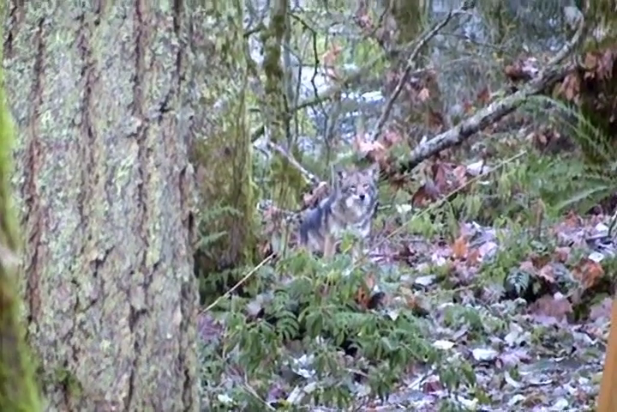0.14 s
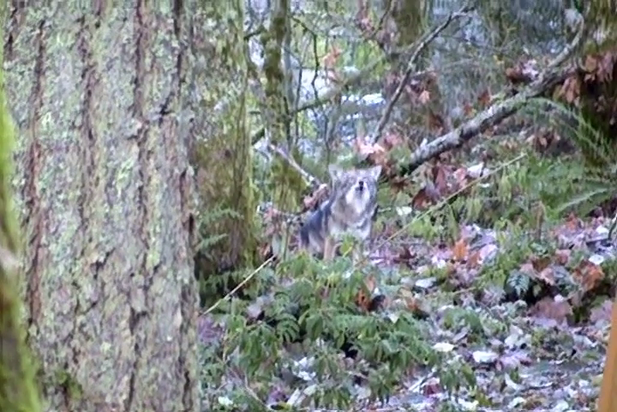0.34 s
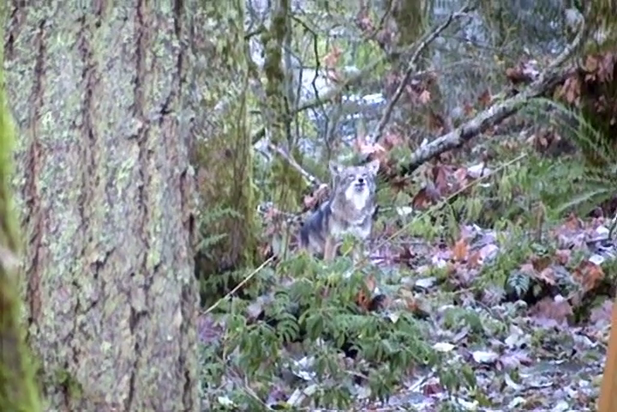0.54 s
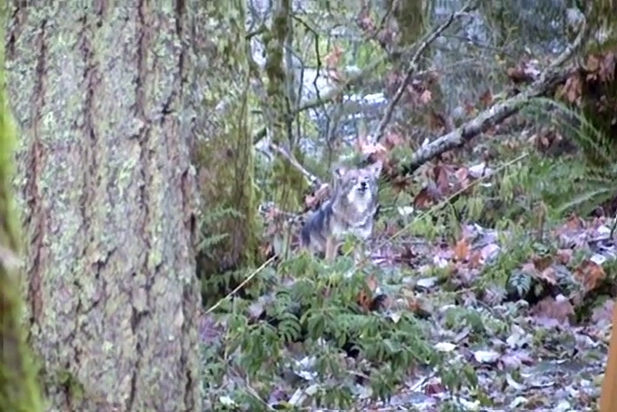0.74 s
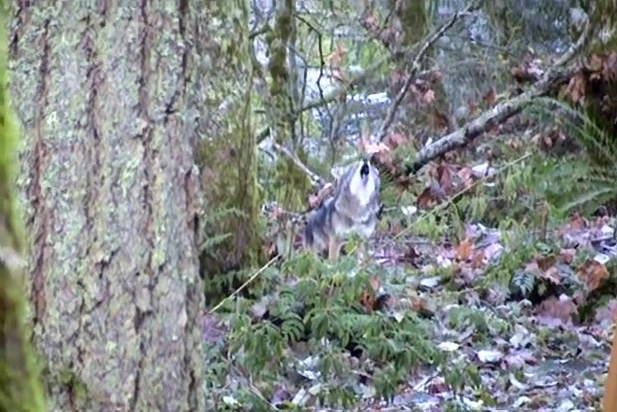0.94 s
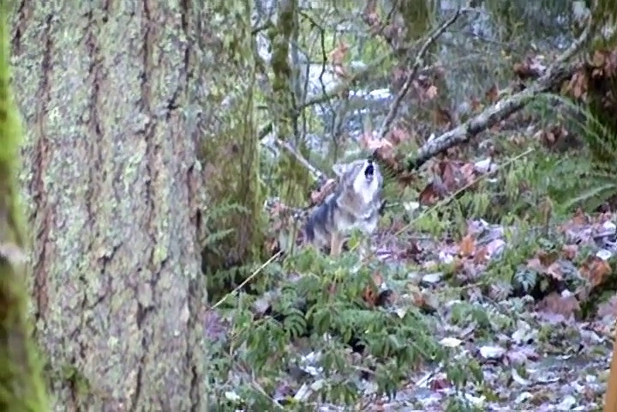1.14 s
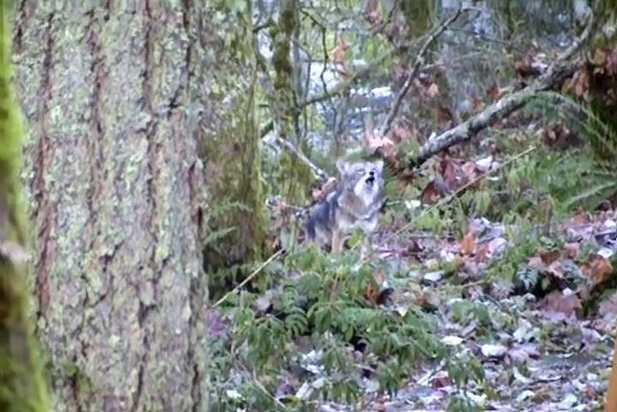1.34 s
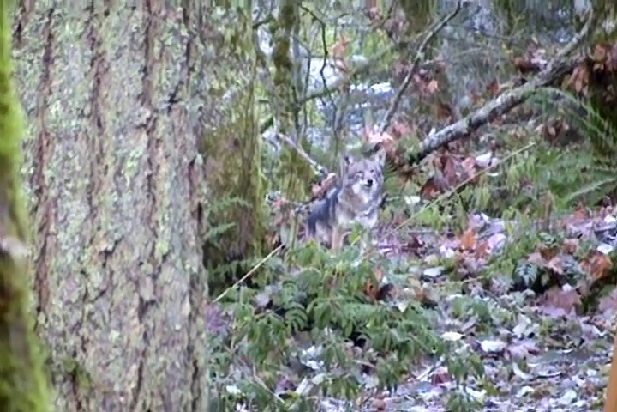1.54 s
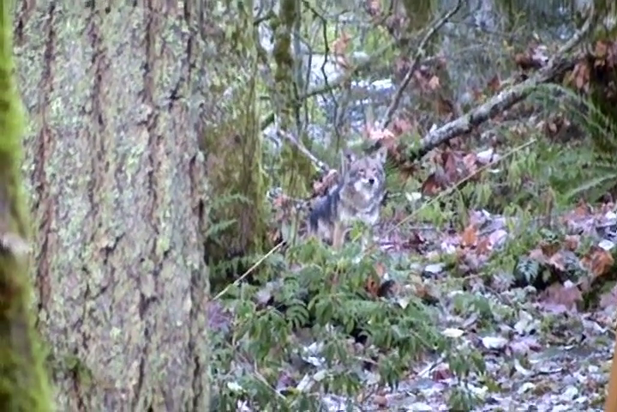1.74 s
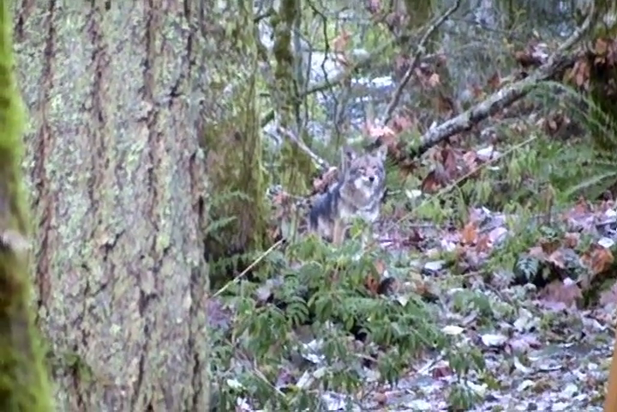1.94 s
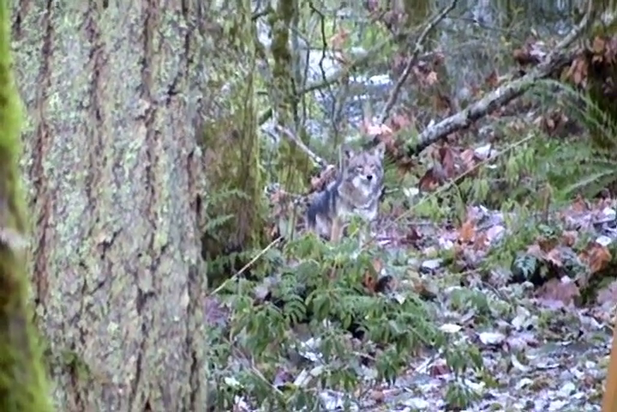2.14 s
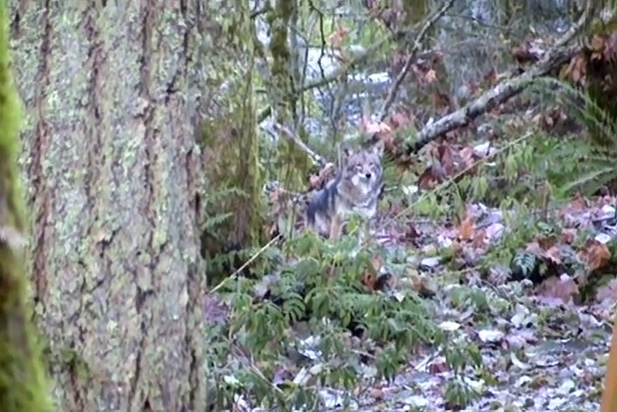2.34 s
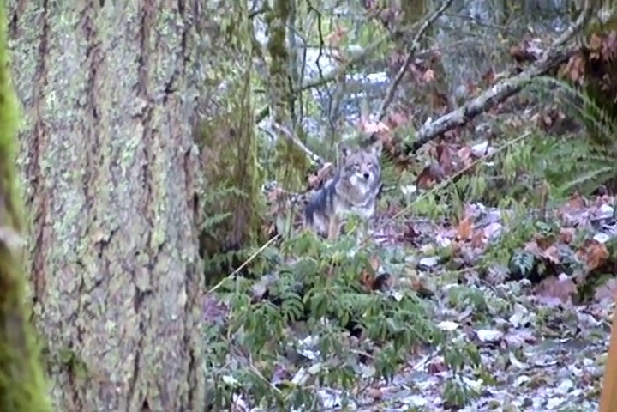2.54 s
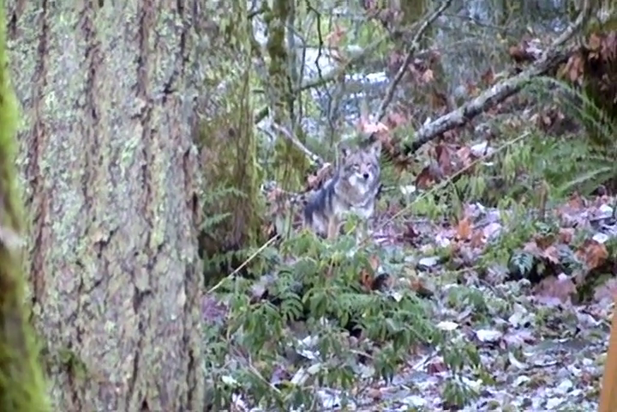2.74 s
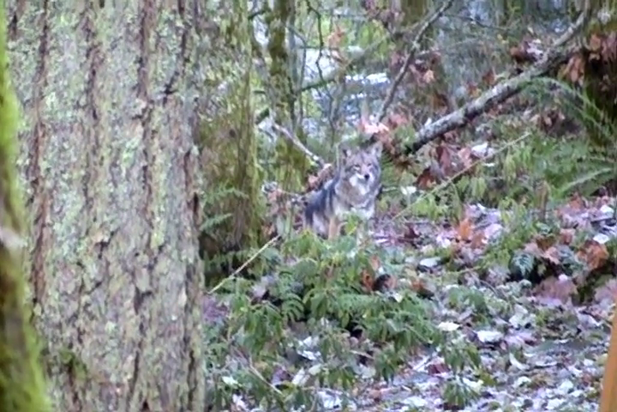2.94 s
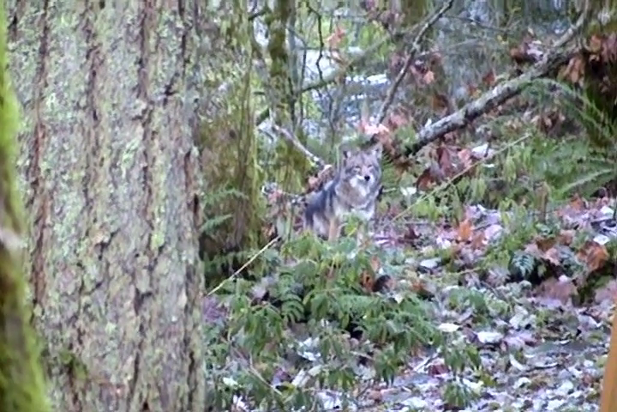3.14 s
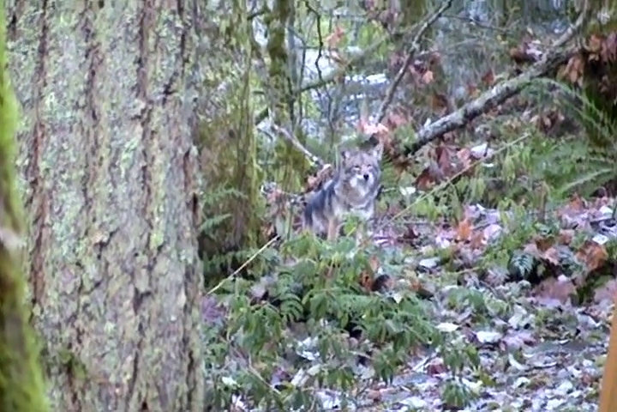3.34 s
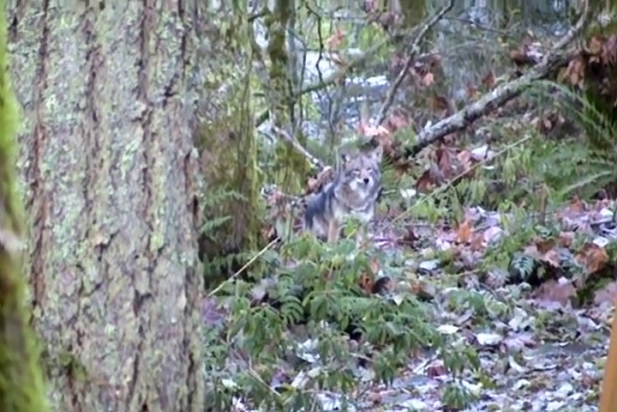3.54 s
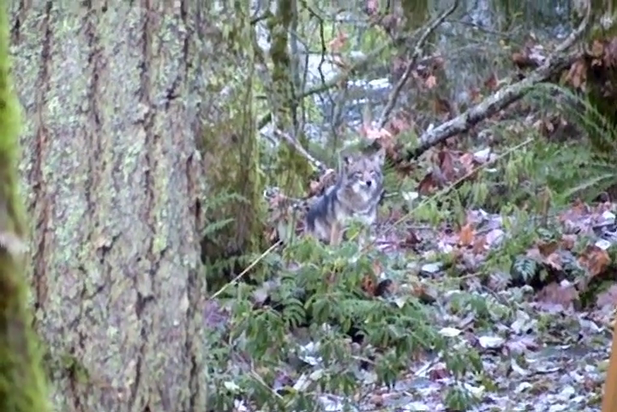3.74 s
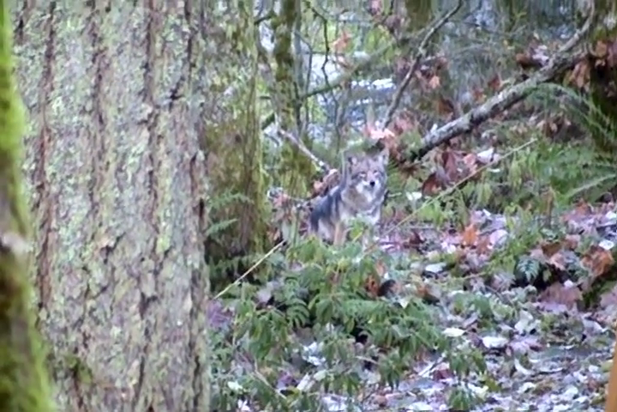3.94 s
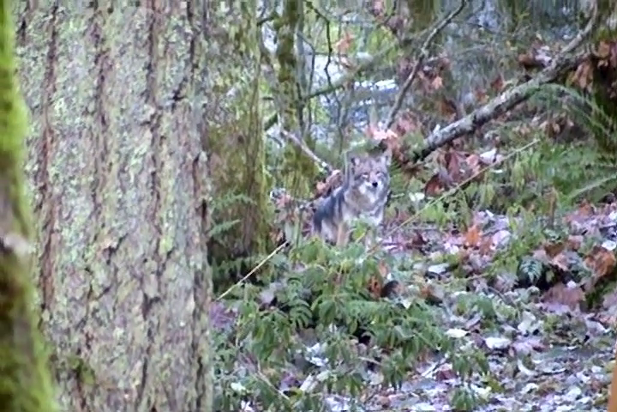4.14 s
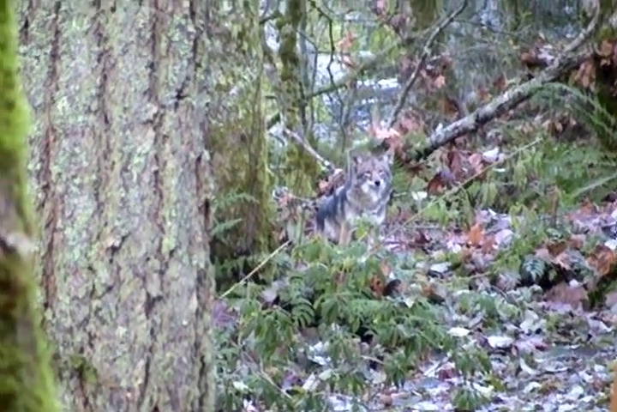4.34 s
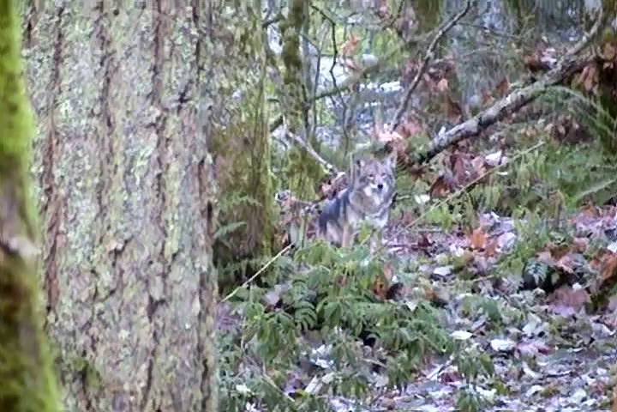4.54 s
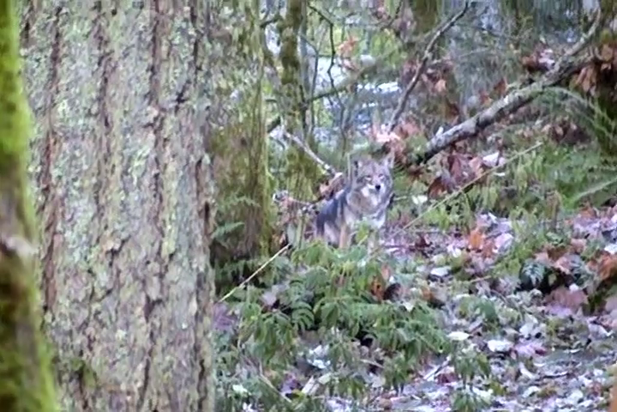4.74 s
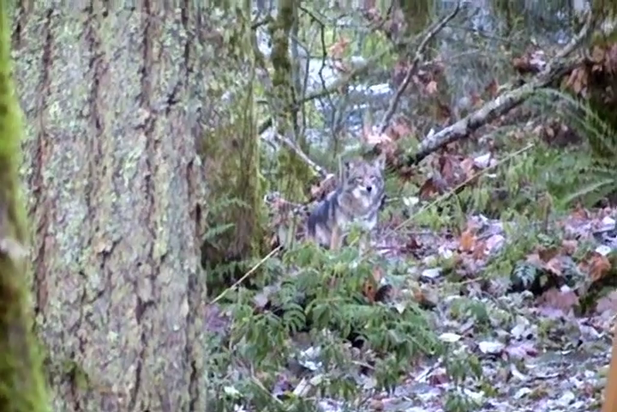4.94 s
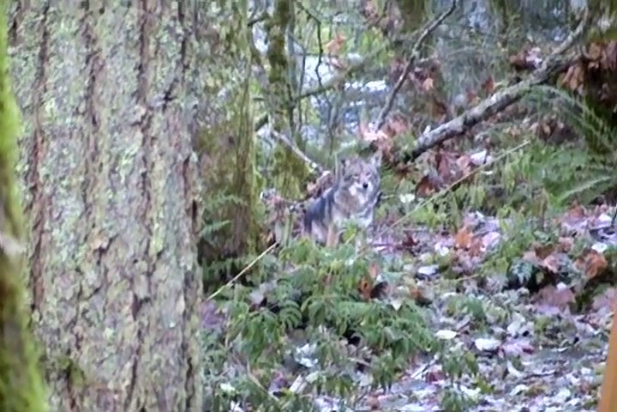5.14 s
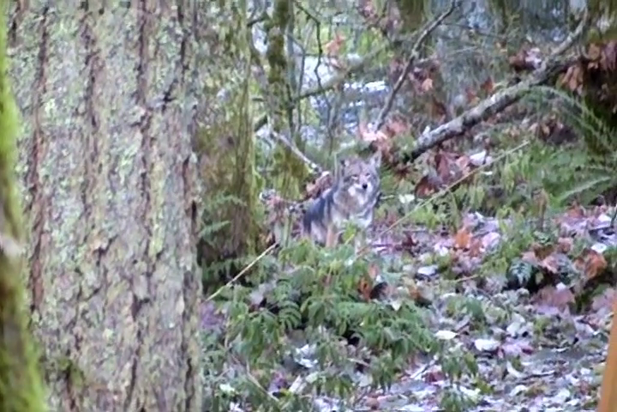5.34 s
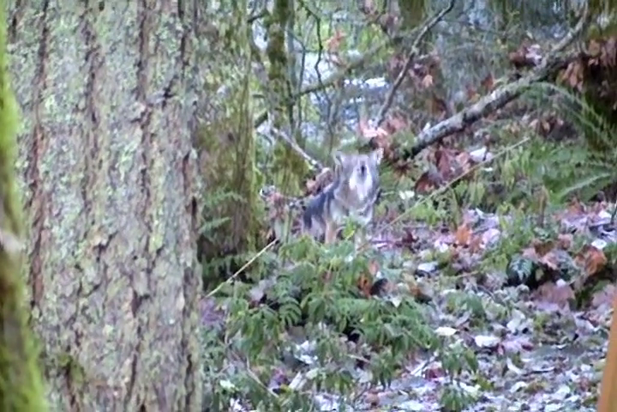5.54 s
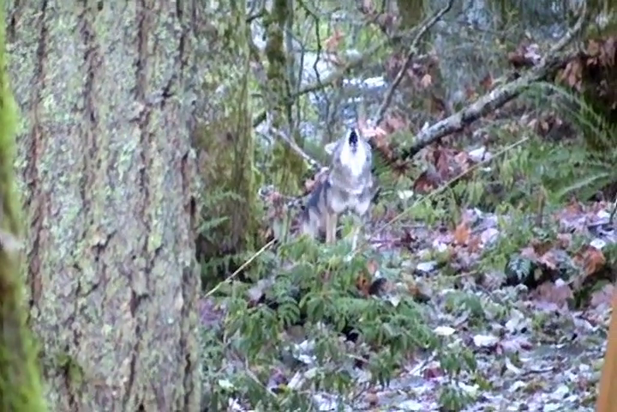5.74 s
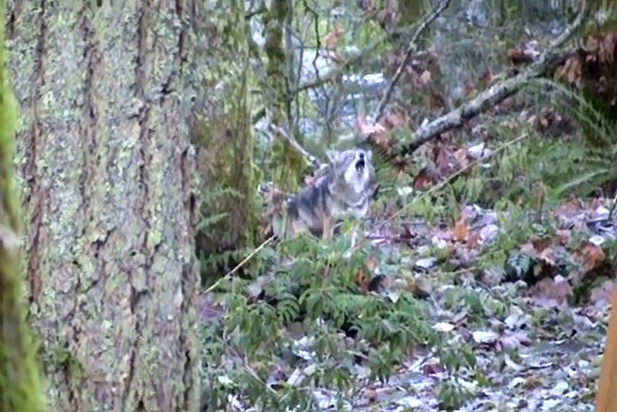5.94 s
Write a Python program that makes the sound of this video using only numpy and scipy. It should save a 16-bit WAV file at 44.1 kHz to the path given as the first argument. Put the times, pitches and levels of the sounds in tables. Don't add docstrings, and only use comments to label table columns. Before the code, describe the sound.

Wet forest, quiet airy rush and faint distant traffic. A coyote barks sharply, then yelps on two ringing notes, the second higher and louder, before its voice drops. Far behind the trees a dog barks in hoarse, irregular short bursts, blurred by woodland reverberation. The coyote woofs quietly once, then stays silent until a sudden loud snarl and yelp end abruptly. The microphone hears the coyote directly, narrow in the centre, with trunk echoes.

```python
import sys
import numpy as np
from scipy import signal
from scipy.fft import rfft, irfft, next_fast_len
from scipy.io import wavfile
from scipy.ndimage import uniform_filter1d, minimum_filter1d

SR = 44100
rng = np.random.default_rng(int(sys.argv[2]) if len(sys.argv) > 2 else 0)


def invert_db(level):
    return 10 ** (np.asarray(level, dtype=float) / 20)


def dump(signal):
    limited = np.clip(np.atleast_2d(signal).T, -1, 1)
    pcm = np.round(limited * 32767).astype(np.int16)
    wavfile.write(sys.argv[1], SR, pcm)


N = 268128


def level(x, db):
    return x * invert_db(db) / np.sqrt(np.mean(x ** 2))


def colour(x, table, stretch=0.98):
    size = next_fast_len(x.shape[-1] + 2048)
    hz = np.fft.rfftfreq(size, 1 / SR) + 1
    points_hz, points_db = np.transpose(table)
    gain_db = np.interp(np.log(hz / stretch), np.log(points_hz), points_db)
    return irfft(rfft(x, size) * invert_db(gain_db), size)[..., :x.shape[-1]]


def noise(count):
    return rng.standard_normal(max(count, SR // 2))[:count]


def walk(count, rate_hz, slowest_hz=0):
    k = max(int(SR / rate_hz), 1)
    x = uniform_filter1d(uniform_filter1d(noise(count), k), k)
    if slowest_hz:
        x = x - uniform_filter1d(x, int(SR / slowest_hz))
    return level(x, 0)


def coyote():
    # f/Hz, level/dB
    mouth_table = [(200, -47), (420, -16), (700, -12), (1000, -9), (1500, -2), (2000, -12.5), (2700, -23),
                   (3400, -40.5), (5000, -53.5), (8000, -92)]
    # f/Hz, level/dB
    skull_table = [(3000, -90), (4350, -58), (4900, -38), (5400, -38), (6150, -26), (6700, -34),
                   (7300, -28), (8300, -42), (9200, -62), (11300, -56), (13000, -76), (15000, -95)]
    # f/Hz, level/dB
    larynx_table = [(2000, -95), (2800, -60), (3400, -41), (3600, -31), (3850, -42), (4600, -60),
                    (6000, -95)]
    # f/Hz, level/dB
    rasp_table = [(300, -34), (600, -16), (870, -16), (990, -3), (1090, -5), (1250, -9), (1400, -5),
                  (1480, 0), (1600, -5), (2200, -12), (3000, -23), (5000, -55), (8000, -95)]
    effort_treble, flap_hz, breath = 1.25, 471, 0.1
    hold = 2601
    out = np.zeros(N + SR)
    for mouth, treble_db, first_db, flap_db, rough, rows in syllables():
        s, hz, db = np.transpose(rows)
        i = np.arange(int(s[0] * SR), int(s[-1] * SR))
        effort_db = np.interp(i / SR, s, db)
        wide_db = np.pad(effort_db, hold, constant_values=-99)
        peaks_db = -minimum_filter1d(-wide_db, size=hold)
        held_db = minimum_filter1d(peaks_db, size=hold)[hold:-hold]
        tone, air = folds(np.interp(i / SR, s, hz), rough, first_db + effort_db - held_db)
        leak = air * (1 + breath / rough)
        flap = invert_db(flap_db + 3.8 * walk(len(i), 25)) * np.cos(2 * np.pi * flap_hz * i / SR)
        tone = tone * (1 + 2 * flap)
        larynx = colour(.45 * tone + leak, larynx_table)
        skull = invert_db(effort_treble * (held_db - db.max())) * colour(tone + leak, skull_table)
        voice = colour(tone, mouth_table, mouth) + colour(air, rasp_table, mouth)
        voice = voice + invert_db(treble_db) * (larynx + skull)
        out[i] += level(voice, 0) * invert_db(held_db) * signal.windows.tukey(len(i), 200 / len(i))
    return out[:N]


def folds(hz, rough, first_db=0.):
    count = len(hz)
    wobble = .0015 * walk(count, 40) + .11 * rough * walk(count, 300, 50)
    phase = 2 * np.pi * np.cumsum(hz * (1 + wobble)) / SR
    order = np.arange(2, int(13000 / hz.max()) + 1)[:, None]
    knots_db = rng.standard_normal((48, 16))[:len(order)] * np.minimum(.4 * order, 4.5)
    knot_at = np.arange(count) / 1500
    sway_db = np.array([np.interp(knot_at, np.arange(16), k) for k in knots_db])
    overtones = (invert_db(sway_db) * np.cos(order * phase + order ** 2)).sum(axis=0)
    stack = overtones + invert_db(first_db) * np.cos(phase)
    air = noise(count) * (1 + .8 * np.cos(phase))
    return level(stack, 0) * invert_db(5 * rough * walk(count, 250, 40)), 1.7 * rough * air


def syllables():
    calls = rises() + breaks() + undertones() + woofs() + whistles() + long_notes()
    return sorted(calls, key=lambda call: call[-1][0][0])


def shaped(s, length_s, db, from_hz, to_hz, shape, bend):
    attack, release, onset_db, swell_db, end_db = shape
    u = np.linspace(0, 1, num=33)
    under_db = np.interp(u, [0, attack, 1 - release, 1], [onset_db, swell_db, 0, end_db])
    return np.transpose([s + length_s * u, from_hz + (to_hz - from_hz) * u ** bend, db - under_db])


def rises():
    # t/s, length/s, peak/dB, top f/Hz, mouth stretch
    rise_table = [
        (0.399, .105, -17, 600, 0.87),
        (0.919, 0.1, -18.5, 701.4, 0.7),
        (5.724, 0.096, -15.5, 627.4, 0.85),
    ]
    shape = (0.24, 0.086, 29, 11.1, 11)
    chest_hz, rough, bend = 452.4, .3, 1.4
    return [(mouth, 2.5, 10, -35, rough, shaped(s, length_s, db, chest_hz, hz, shape, bend))
            for s, length_s, db, hz, mouth in rise_table]


def breaks():
    # t/s, length/s, peak/dB, from f/Hz, to f/Hz
    break_table = [
        (0.479, 0.057, -16.5, 868, 572.4),
        (0.972, 0.09, -20.5, 669.3, 930),
        (1.221, .016, -17, 1627, 1214),
        (1.485, .062, -16, 1084, 455.5),
    ]
    shape = (0.23, 0.51, 8, 1.6, 15.5)
    rest_hz, jaw_power, rough, bend = 794, 0.53, .33, .5
    calls = []
    for row in break_table:
        height = (row[3] + row[4]) / 2 / rest_hz
        cleaner = rough / max(height, 1) ** 2
        calls.append((height ** jaw_power, -5, 5, -42, cleaner, shaped(*row, shape, bend)))
    return calls


def undertones():
    # t/s, length/s, peak/dB, f/Hz, fundamental/dB
    under_table = [
        (.99, .14, -34, 438, 8),
        (5.84, .2, -15.5, 712, 3),
    ]
    shape = (0.65, 0.32, 11, 1.6, 28)
    return [(.8, -16, first_db, -40, .15, shaped(s, length_s, db, hz, hz, shape, 1))
            for s, length_s, db, hz, first_db in under_table]


def woofs():
    # t/s, length/s, peak/dB, from f/Hz, to f/Hz
    woof_table = [
        (3.485, .115, -36, 480, 436),
    ]
    shape = (0.0902, 0.51, 8.1, 0.34, 28)
    return [(.72, -9, 8, -22, .3, shaped(*row, shape, 0.97)) for row in woof_table]


def whistles():
    # t/s, length/s, peak/dB, from f/Hz, to f/Hz
    whistle_table = [
        (.398, .11, -49, 3550, 3800),
        (.91, .11, -51, 3350, 3750),
        (3.485, .15, -56, 3780, 3290),
        (5.712, .11, -45, 3500, 4000),
    ]
    shape = (.12, .25, 12, 2.5, 10)
    return [(1, 1.1, 25, -40, .2, shaped(*row, shape, 1)) for row in whistle_table]


def long_notes():
    # t/s, f/Hz, level/dB
    low_yelp = [(1.022, 883, -23), (1.035, 893.4, -16.5), (1.06, 911, -15.5), (1.146, 953, -17.5),
                (1.179, 930.3, -16), (1.204, 947.7, -17.5), (1.221, 941, -13)]
    high_yelp = [(1.232, 1249, -18.5), (1.276, 1221, -12.5), (1.329, 1222, -11.5), (1.376, 1224, -11),
                 (1.401, 1213, -12.5), (1.425, 1203, -15.5), (1.443, 1226, -30), (1.46, 1229, -12.5),
                 (1.495, 1211, -13.5)]
    snarl = [(5.785, 467.7, -26), (5.82, 490.4, -13.5), (5.863, 502, -9), (5.931, 490.2, -13.5),
             (6.002, 487.7, -12.5), (6.01, 480, -25)]
    last_yelp = [(5.998, 918, -26), (6.008, 921, -17), (6.03, 931, -16), (6.09, 985, -16)]
    # mouth stretch, treble/dB, fundamental/dB, side tones/dB
    voices = [
        (0.91, -8, -12, -32),
        (0.98, -6, 0.5, -23),
        (0.97, -2, -35, -49),
        (0.92, -8, -7, -36),
    ]
    roughs = [.035, .02, .38, .035]
    courses = [low_yelp, high_yelp, snarl, last_yelp]
    return [(*voice, rough, rows) for voice, rough, rows in zip(voices, roughs, courses)]


def dog():
    # t/s, peak/dB, f/Hz, length/s
    barks = [(1.692, -33, 367.3, 0.1), (1.772, -34.5, 412.8, 0.179), (1.996, -32.5, 392.6, 0.097),
             (2.101, -34.5, 340, 0.14), (2.253, -43.5, 351, 0.0975), (2.416, -37, 357, 0.1144),
             (2.632, -37.5, 373.5, 0.102), (2.71, -36, 371.2, 0.095), (2.824, -48.5, 390, 0.127),
             (3.008, -34, 415.6, 0.1116), (3.163, -47.5, 416.5, 0.114), (3.674, -33.5, 433.5, 0.139),
             (3.805, -37, 425, 0.037), (3.901, -32, 430.8, 0.091), (3.959, -33, 403, 0.081),
             (4.129, -36, 400.2, 0.1026), (4.34, -36.5, 398.2, 0.11), (4.545, -35.5, 397.3, 0.097),
             (4.625, -40, 365.3, 0.035), (4.792, -59, 384, 0.087)]
    # f/Hz, level/dB
    throat = [(200, -19), (400, -6.5), (580, -3), (780, 2.5), (1050, -13.5), (1330, -4.5), (1600, -14.5),
              (2250, -21.5), (2700, -36), (5000, -63.5)]
    out = np.zeros(N)
    for s, db, hz, length_s in barks:
        u = np.linspace(0, 1, int(max(length_s, .03) * SR))
        pitch_hz = hz * (1 + .05 * np.sin(np.pi * u) - .08 * u)
        tone, air = folds(pitch_hz, rough=.36)
        bark = level(colour(tone + air, throat), db)
        start = int(s * SR)
        out[start:start + len(u)] += bark * np.sin(np.pi * u ** 0.7) ** 1.13
    return out


def trunk_echoes(near):
    # delay/s, level/dB
    echo_table = [
        (.043, -9),
        (.105, -20.5),
        (.17, -30),
    ]
    echoes = sum(invert_db(db) * np.pad(near, (int(s * SR), 0))[:N] for s, db in echo_table)
    return signal.sosfilt(signal.butter(1, 3000, fs=SR, output="sos"), echoes)


def forest(x, wet_db, share=0.72):
    # f/Hz, T60/s
    t60_table = [(300, 2.5), (1200, 1.71), (2500, 1.91), (5000, 0.75), (10000, 0.4)]
    rise_s = 0.0026
    t = np.arange(int(2.5 * SR)) / SR
    points_hz, t60_s = np.transpose(t60_table)
    tail = 0
    for hz in 150 * 2. ** np.arange(0, 6.6, .5):
        sos = signal.butter(2, [hz / 2 ** 0.42, hz * 2 ** 0.4], "bandpass", fs=SR, output="sos")
        band = signal.sosfilt(sos, rng.standard_normal((2, len(t))))
        tail = tail + band * invert_db(-60 * t / np.interp(np.log(hz), np.log(points_hz), share * t60_s))
    tail = tail * (1 - np.exp(-t / rise_s))
    tail = tail * invert_db(wet_db) / np.sqrt(np.sum(tail[0] ** 2))
    return signal.fftconvolve(x[None], tail, axes=1)[:, :N]


def tick():
    # t/s, peak/dB, ring f/Hz
    drip = (3.9507, -38, 3830)
    s, db, hz = drip
    t = np.maximum(np.arange(N) / SR - s, 0)
    ring = np.exp(-t / 0.0012) * np.sin(2 * np.pi * hz * t)
    click = 2.3 * np.exp(-t / .0005) * uniform_filter1d(rng.standard_normal(N), size=3)
    return invert_db(db) * (t > 0) * (ring + click)


def bird():
    # t/s, length/s, level/dB, f/Hz
    bird_table = [
        (4.13, .45, -64, 2830),
    ]
    t = np.arange(N) / SR
    out = np.zeros(N)
    for s, length_s, db, hz in bird_table:
        gain = invert_db(db + 1.2 * walk(N, 19)) * np.clip(np.minimum(t - s, s + length_s - t) / 0.036, 0, 1)
        out += gain * np.sin(2 * np.pi * np.cumsum(hz * (1 + 0.0033 * walk(N, 30))) / SR)
    return out


def background():
    # f/Hz, level/dB per Hz
    hum_table = [(18, -40), (30, -30), (135, 2.5), (308, -14.5), (344, -3), (479, -16.5), (974, -29.5),
                 (1590, -35.5), (1730, -21.5), (6000, -53.5), (7800, -80.5), (13200, -120)]
    # t/s, level/dB
    swell = [(0.0, -56), (2.2, -56.5), (4.0, -45), (6.08, -47)]
    # f/Hz, level/dB per Hz
    air_table = [(150, -0.5), (350, 3), (800, 3), (1500, -5.5), (3000, -22.5), (6000, -30), (10000, -48)]
    s, db = np.transpose(swell)
    swell_db = np.interp(np.arange(N) / SR, s, db) + 2.0 * walk(N, 13.0)
    hum = level(colour(rng.standard_normal((2, N)), hum_table), 0) * invert_db(swell_db)
    air = level(colour(rng.standard_normal((2, N)), air_table), -44) * invert_db(1.0 * walk(N, 2.4))
    return hum + air


def scene():
    near, far = coyote(), dog()
    mid, side = forest(near, wet_db=-11.5) + forest(far, wet_db=-1.5, share=0.82) + background()
    mid = mid + near + trunk_echoes(near) + far + tick() + bird()
    side = invert_db(-18) * side
    return np.array([mid + side, mid - side])


def band_limit(x):
    return signal.sosfilt(signal.butter(12, 15750, fs=SR, output="sos"), x)


def record(dry):
    # f/Hz, left minus right/dB
    balance = [(30, 2), (200, 0.7), (1000, 0.96), (3000, 2), (6000, -1.5), (12000, -4.5)]
    hiss_db, clip_at = -68, 1.0
    left = colour(dry[0], [(hz, db / 2) for hz, db in balance])
    right = colour(dry[1], [(hz, -db / 2) for hz, db in balance])
    hiss = invert_db(hiss_db) * (rng.standard_normal((2, N)) + 1.2 * rng.standard_normal(N))
    highpass = signal.butter(2, 38, "highpass", fs=SR, output="sos")
    loud = signal.sosfilt(highpass, np.array([left, right])) + hiss
    rounded = loud / (1 + np.abs(loud / clip_at) ** 16) ** (1 / 16)
    return band_limit(rounded)


dry = scene()
out = record(dry)
dump(out)
```